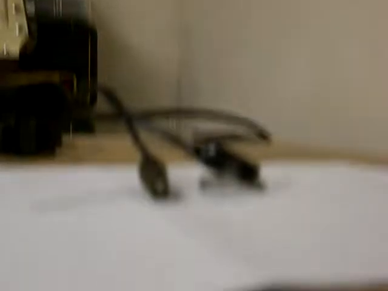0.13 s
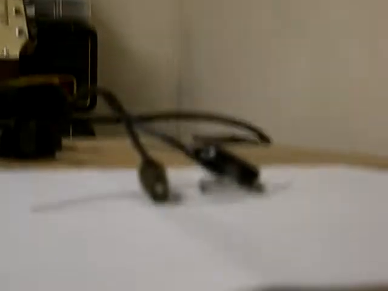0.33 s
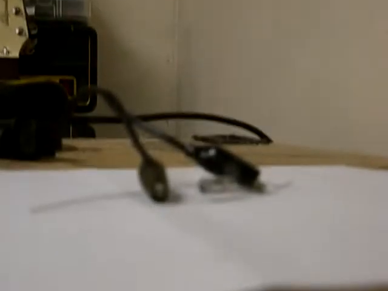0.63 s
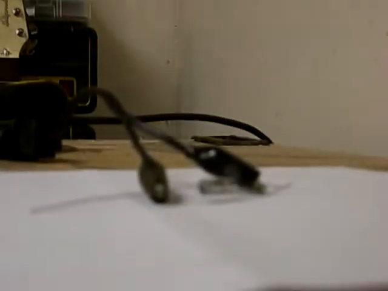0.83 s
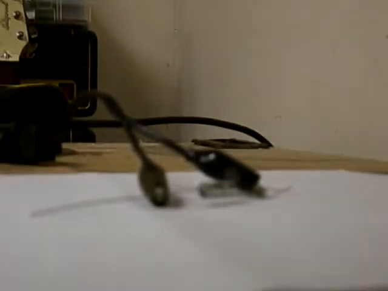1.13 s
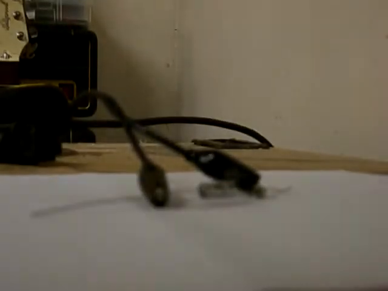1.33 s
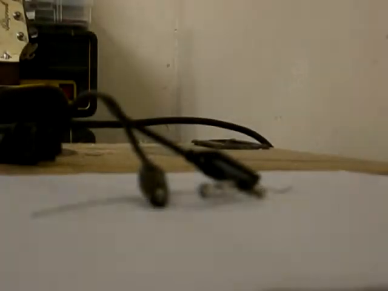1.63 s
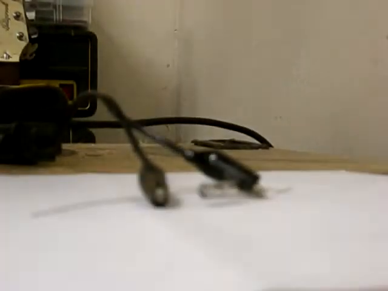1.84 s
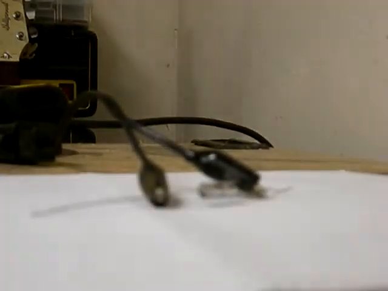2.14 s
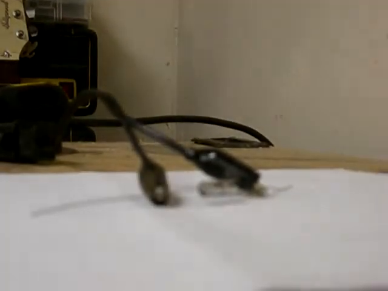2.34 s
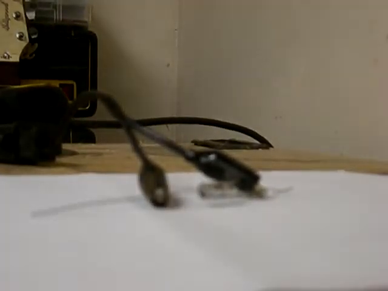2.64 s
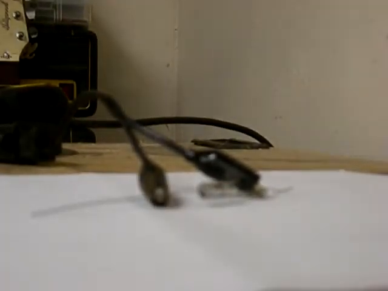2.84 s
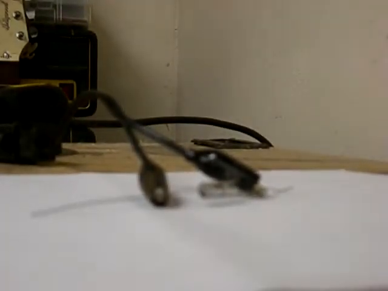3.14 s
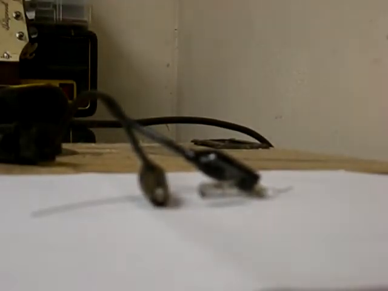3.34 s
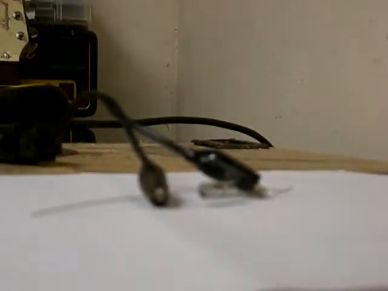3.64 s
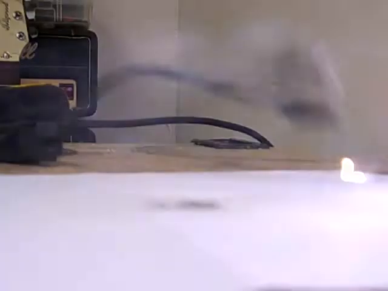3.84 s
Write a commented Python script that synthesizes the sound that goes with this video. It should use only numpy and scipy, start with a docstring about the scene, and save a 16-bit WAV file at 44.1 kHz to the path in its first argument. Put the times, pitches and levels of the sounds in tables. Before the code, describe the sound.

A small electronic part bursts with a very loud, distorted bang after faint, gathering crackles.

```python
"""Capacitor burst on a workbench

An overloaded capacitor crackles, then bursts close to a small camera. Room hiss (coloured noise) fades in
over rumble, a thin whine and bumps (decaying low sines). Soft scuffs (swelling noise bands) and
spits (noise bursts through the part's resonances) gather, and a thin wire rings. A sharp noise crack
leads the bang: arc noise, a low push, noise reverb and ringing modes. Fragments tap as the room rings
out. The bang overloads the microphone, modelled as uneven soft clipping."""
import sys
import numpy as np
from scipy import signal
from scipy.fft import rfft, irfft
from scipy.io import wavfile
from scipy.ndimage import uniform_filter1d

SR = 44100
rng = np.random.default_rng(int(sys.argv[2]) if len(sys.argv) > 2 else 0)


def pcm_store(signal):
    """Save signal as 16-bit PCM."""
    levels = np.round(np.clip(np.atleast_2d(signal), -1, 1) * 32767)
    wavfile.write(sys.argv[1], SR, levels.astype(np.int16).T)


N = 176400
T = np.arange(N) / SR  # seconds
HZ = np.fft.rfftfreq(N, 1 / SR)


def amp(db):
    """Decibels to gain."""
    return 10 ** (np.asarray(db) / 20)


def unit(x):
    """Scales to rms 1."""
    return x / np.sqrt(np.mean(x ** 2) + 1e-20)


def spectrum(points):
    """Gain at every frequency from (Hz, dB) points, joined on a log-frequency axis."""
    hz, db = np.transpose(points)
    return amp(np.interp(np.log(HZ + 1), np.log(hz + 1), db))


def level(points):
    """Gain at every moment from (seconds, dB) points."""
    return amp(np.interp(T, *np.transpose(points)))


def noise(gain):
    """Noise of rms 1 with the given colour, so only the shape of the gain matters."""
    white = rng.standard_normal(N)
    return unit(irfft(rfft(white) * gain, N))


def grain(depth_db, size=40):
    """Random flutter in strength, smoothed over size samples (about a millisecond or two)."""
    flutter = unit(uniform_filter1d(rng.standard_normal(N), size))
    return unit(amp(depth_db * flutter))


def strike(start, rise, decay):
    """Envelope with a straight rise and an exponential fall (time constant), all in seconds."""
    t = np.maximum(T - start, 0)
    fall = np.exp(-np.minimum(np.maximum(t - rise, 0) / decay, 20))
    return np.minimum(t / rise, 1) * fall


def ring(start, db, hz, t60):
    """One mode: a sine that loses 60 dB in t60 seconds."""
    t = np.maximum(T - start, 0)
    return amp(db - 60 * t / t60) * np.sin(2 * np.pi * hz * t)


def hump(hz, octaves):
    """A broad resonance: a bell on a log-frequency axis."""
    return np.exp(-.5 * (np.log2((HZ + 1) / hz) / octaves) ** 2)


# Colour of the room hiss. Each row: frequency in Hz, relative level in dB.
HISS_COLOUR = [(30, 11), (150, 13.5), (400, 7), (1000, 2.5), (2000, 0), (4500, -5), (7000, -9), (10000, -8),
               (13000, -14), (16000, -14)]
# How the hiss fades in and wavers. Each row: time in seconds, level in dB.
HISS_LEVEL = [(0, -102), (.07, -73.5), (.16, -67.5), (.37, -63), (.6, -54.5), (.9, -55), (1.35, -50),
              (1.68, -54.5), (1.95, -48.5), (2.2, -53.5), (2.6, -49), (2.87, -51), (3.1, -45),
              (3.37, -51.5), (3.55, -48), (3.75, -55)]


def room_hiss():
    """Coloured noise with a moving level."""
    return level(HISS_LEVEL) * noise(spectrum(HISS_COLOUR))


# Colour of the handling rumble. Each row: frequency in Hz, relative level in dB.
RUMBLE_COLOUR = [(3, -5.5), (10, -1.5), (20, -4.5), (40, -12), (65, -17), (110, -27), (250, -35.5),
                 (1000, -80)]
# How the rumble comes and goes. Each row: time in seconds, level in dB.
RUMBLE_LEVEL = [(0, -77), (.06, -74), (.09, -39), (.8, -41.5), (1.1, -45.5), (1.75, -43), (1.88, -38.5),
                (2.15, -45), (2.55, -32.5), (2.82, -46), (3.08, -36), (3.35, -46), (3.5, -42), (3.75, -50)]


def handling_rumble():
    """Very low noise that swells and sinks."""
    return level(RUMBLE_LEVEL) * noise(spectrum(RUMBLE_COLOUR))


# Dry ticks. Each row: start in seconds, peak level in dB.
TICKS = [(.072, -40), (.242, -34)]


def ticks(decay_s=0.00074):
    """Bare one-sided pulses that rise in two samples and die within milliseconds."""
    return sum(amp(db) * strike(start, 2 / SR, decay_s) for start, db in TICKS)


# Narrow bands of electronic hiss. Each row: centre in Hz, width in Hz, level in dB.
WHINE_BANDS = [(7830, 270, -75.5), (15750, 130, -73.5)]


def recorder_whine():
    """Steady bell-shaped noise bands, switched on at the first tick."""
    whine = 0
    for hz, width, db in WHINE_BANDS:
        whine = whine + amp(db) * noise(np.exp(-2 * ((HZ - hz) / width) ** 2))
    return whine * (T > TICKS[0][0])


# Bumps on the camera. Each row: start in seconds, level in dB, pitch in Hz.
BUMPS = [(.092, -36.5, 120), (.213, -28.5, 66), (.283, -25, 87), (.426, -30.5, 62.3), (.469, -25.5, 80),
         (2.635, -28.5, 84.7), (2.94, -30, 80), (3.098, -26, 74.4)]
# Colour of the rubbing in each bump. Each row: frequency in Hz, relative level in dB.
BUMP_RUB_COLOUR = [(60, -5), (250, 0), (500, -14), (1000, -26), (4000, -44), (16000, -48)]
BUMP_RISE_S, BUMP_DECAY_S = 0.00408, 0.017
BUMP_RUB_DB = -17  # relative to the bump level


def bumps():
    """The camera body thuds as a decaying low sine with a little rubbing noise."""
    rub = amp(BUMP_RUB_DB) * noise(spectrum(BUMP_RUB_COLOUR))
    thuds = np.zeros(N)
    for start, db, hz in BUMPS:
        thud = rub - np.sin(2 * np.pi * hz * (T - start))
        thuds += amp(db) * strike(start, BUMP_RISE_S, BUMP_DECAY_S) * thud
    return thuds


# Soft scuffs. Each row: start in seconds, length in seconds, level in dB, centre in Hz.
SCUFFS = [(0.826, 0.22, -54.5, 1290), (1.173, 0.076, -57.5, 4500), (1.327, 0.093, -55.5, 3020),
          (1.782, 0.079, -50.5, 474), (1.881, .14, -51, 606), (2.24, 0.15, -48, 540),
          (2.452, 0.051, -42, 650), (2.568, 0.045, -41.5, 516), (2.613, 0.062, -43.5, 2000),
          (2.623, 0.044, -36, 515), (2.984, 0.019, -38, 1480), (2.995, .1, -44.5, 644),
          (3.085, 0.068, -39, 530), (3.116, 0.074, -44.5, 1600), (3.177, 0.031, -37.5, 1880),
          (3.189, 0.067, -45.5, 700), (3.237, .045, -40.5, 1680), (3.458, 0.11, -51, 2200),
          (3.62, 0.084, -52, 1900)]
# Colour of the skirt around the scuff resonance, before its trim.
# Each row: frequency in Hz, relative level in dB.
SCUFF_SKIRT_COLOUR = [(60, 3), (300, 11.5), (2500, -4.5), (6000, -11), (16000, -13)]
SCUFF_OCTAVES, SCUFF_GRAIN_DB = 0.4, 3.5  # resonance spread, flutter depth
SCUFF_SKIRT_TRIM_DB = -11


def scuffs():
    """Short grainy rubs, each swelling quickly around one resonance."""
    skirt = amp(SCUFF_SKIRT_TRIM_DB) * spectrum(SCUFF_SKIRT_COLOUR)
    rubs = np.zeros(N)
    for start, length, db, hz in SCUFFS:
        progress = np.clip((T - start) / length, 0, 1)
        swell = np.sin(np.pi * progress ** 0.59)  # peaks about a third of the way in
        rubs += amp(db) * swell * noise(hump(hz, SCUFF_OCTAVES) + skirt)
    return rubs * grain(SCUFF_GRAIN_DB, size=90)


# Spits of the hot part.
# Each row: start in seconds, level in dB, decay in seconds, broadband snap in dB relative to the spit.
SPITS = [(1.465, -52.5, 0.012, 1.5), (1.504, -51.5, 0.02, -10), (1.722, -43, 0.029, -15),
         (2.034, -54, 0.014, 6.5), (2.13, -51, .018, -18), (2.288, -51, .006, 0.5), (2.343, -51, .005, -12),
         (2.393, -47, .006, -6), (2.43, -50, 0.014, -8), (2.451, -48.5, .008, -7),
         (2.463, -42.5, 0.011, 0.5), (2.572, -41.5, 0.0046, -5), (2.587, -44.5, 0.0073, -0.5),
         (2.62, -34, 0.009, -15), (2.651, -42, .011, -6), (2.719, -41.5, 0.0037, -0.5),
         (2.755, -51, .004, -14), (2.792, -36.5, 0.0043, 4.5), (2.91, -42.5, 0.013, -18),
         (2.932, -30.5, 0.01, -12), (2.951, -37.5, 0.0047, 1), (3.005, -38, .005, -4),
         (3.023, -43, .008, -7), (3.04, -46, .012, -3), (3.091, -40.5, 0.0051, -20),
         (3.135, -42.5, 0.0069, -12), (3.149, -42.5, 0.0045, -0.5), (3.29, -39, 0.0086, -12.5),
         (3.332, -54, .004, 3), (3.431, -39.5, 0.021, -9.5), (3.465, -34, 0.0064, -8.5),
         (3.481, -35, 0.02, -8.5), (3.588, -39, 0.0044, -6), (3.654, -37.5, 0.0036, 6),
         (3.668, -51, 0.006, -4), (3.729, -49, .004, -17)]
# The part's resonances. Each row: centre in Hz, width in Hz, relative level in dB before a treble tilt.
CASE_MODES = [(6280, 200, -16), (7070, 300, -8), (8330, 220, -6), (10220, 170, 6.5), (11500, 370, -1.5),
              (12800, 230, -1.5), (13500, 250, -4), (15400, 580, -6.5)]
# Colour of the broadband snap. Each row: frequency in Hz, relative level in dB.
SNAP_COLOUR = [(200, -14), (1000, -4), (2200, -2), (3800, 0.5), (7000, -2), (11000, -6), (16000, -21)]
SPIT_RISE_S, SPIT_GRAIN_DB = 0.00066, 3


def crackle(echo_db=-17, echo_s=0.021):
    """Grainy spits ring the case; the sharper ones snap across the whole band."""
    power = sum(amp(db) ** 2 / (1 + (2 * (HZ - hz) / width) ** 2) for hz, width, db in CASE_MODES)
    treble_tilt = HZ / (HZ + 4000)
    case = noise(np.sqrt(power) * treble_tilt)
    snap = noise(spectrum(SNAP_COLOUR))
    spits = np.zeros(N)
    for start, db, decay, snap_db in SPITS:
        direct = strike(start, SPIT_RISE_S, decay)
        echo = amp(echo_db) * strike(start, 0.0035, echo_s)  # a softer, slower tail
        spits += amp(db) * (direct + echo) * (case + amp(snap_db) * snap)
    return spits * grain(SPIT_GRAIN_DB)


# The thin wire. Its one row: start in seconds, level in dB, pitch in Hz, 60 dB decay in seconds.
WIRE_PING = (3.486, -35, 8385, 0.3)


def wire_ping():
    """A thin wire rings as one high decaying sine."""
    return ring(*WIRE_PING)


# Colour of the leading crack. Each row: frequency in Hz, relative level in dB.
CRACK_COLOUR = [(200, -20), (1200, -10), (3000, -9), (9000, 3), (16000, -2)]
CRACK_S, CRACK_DB, CRACK_DECAY_S = 3.7735, -5.5, 0.0015


def case_crack():
    """The case cracks: a very short, bright noise burst."""
    return amp(CRACK_DB) * strike(CRACK_S, .0002, CRACK_DECAY_S) * noise(spectrum(CRACK_COLOUR))


BANG_S = 3.780  # start of the arc, push, room sound and bench rings
# Colour of the arc. Each row: frequency in Hz, relative level in dB.
ARC_COLOUR = [(40, 3), (200, 3.5), (1000, 1.5), (3500, 0.5), (7000, -2.5), (10000, 2), (16000, -9.5)]
ARC_LENGTH_S, ARC_DB = .03, -4


def arc():
    """An arc flares briefly: a hard-gated slab of grainy noise."""
    gate = (T > BANG_S) & (T < BANG_S + ARC_LENGTH_S)
    return amp(ARC_DB) * gate * noise(spectrum(ARC_COLOUR)) * grain(4, size=80)


PUSH_HZ, PUSH_DB, PUSH_DECAY_S = 65.4, -8, 0.023


def pressure_push():
    """The pressure wave shakes the camera: a decaying low cosine that starts downward."""
    wave = -np.cos(2 * np.pi * PUSH_HZ * (T - BANG_S))
    return amp(PUSH_DB) * strike(BANG_S, 0.0011, PUSH_DECAY_S) * wave


# Colour of the early room sound. Each row: frequency in Hz, relative level in dB.
EARLY_COLOUR = [(40, -14), (150, 2), (350, 2), (700, -2), (1300, -1.5), (2200, 0.5), (3700, 1.5),
                (5500, -7.5), (7500, -11), (10300, -10.5), (13000, -18), (16000, -27)]
# Colour of the late room sound. Each row: frequency in Hz, relative level in dB.
LATE_COLOUR = [(40, -12), (115, 1), (190, -3), (270, 2.5), (390, 2), (550, -6), (900, -13), (1400, -7.5),
               (2200, 0), (4000, 1.5), (5500, -2.5), (7500, -11), (10300, -7.5), (13000, -23), (16000, -29)]
EARLY_DB, EARLY_T60_S = 0, 0.21
LATE_DB, LATE_T60_S = -23, 0.99


def room_reverb():
    """The small room answers with a loud short noise tail and a faint long one."""
    to_decay = 1 / np.log(1000)  # 60 dB time to time constant
    early = amp(EARLY_DB) * strike(BANG_S, 0.0044, EARLY_T60_S * to_decay) * noise(spectrum(EARLY_COLOUR))
    late = amp(LATE_DB) * strike(BANG_S, 0.013, LATE_T60_S * to_decay) * noise(spectrum(LATE_COLOUR))
    return early + late


# Things ringing on the bench. Each row: pitch in Hz, level in dB, 60 dB decay in seconds.
BENCH_RINGS = [(112.3, -36.5, 1.3), (190, -35, 0.86), (264, -33, 0.66), (377, -35.5, 1.9), (1916, -39, 1.1),
               (2200, -34, 1), (2360, -40, 0.97)]


def bench_rings():
    """Things on the bench ring on as decaying sines."""
    return sum(ring(BANG_S, db, hz, t60) for hz, db, t60 in BENCH_RINGS)


# Fragments landing. Each row: start in seconds, level in dB, centre in Hz.
FRAGMENTS = [(3.886, -25, 5000), (3.949, -34, 6000), (3.993, -32, 950)]
FRAGMENT_DECAY_S = .005


def fragments():
    """Bits of the case tap the bench and wall: short bursts of broad-band noise."""
    taps = np.zeros(N)
    for start, db, hz in FRAGMENTS:
        taps += amp(db) * strike(start, .001, FRAGMENT_DECAY_S) * noise(hump(hz, .6))
    return taps


def scene():
    """Everything that reaches the microphone, as one channel."""
    background = room_hiss() + handling_rumble() + recorder_whine()
    build_up = ticks() + bumps() + scuffs() + crackle() + wire_ping()
    bang = case_crack() + arc() + pressure_push() + room_reverb() + bench_rings()
    return (background + build_up + bang + fragments())[None]


# Microphone colour, with a narrow treble dip. Each row: frequency in Hz, gain in dB.
MIC_COLOUR = [(20, 0.5), (7300, -1), (7850, -5), (8300, 0), (16000, -3)]
CLIP_TOP, CLIP_BOTTOM = 0.61, 0.46  # limits of the two half-waves before the filters
EDGE_HZ = 16000  # upper band limit


def record(dry):
    """The microphone overloads unevenly, then its colour and the band limit filter the result."""
    rail = np.where(dry > 0, CLIP_TOP, CLIP_BOTTOM)
    clipped = rail * np.tanh(dry / rail)
    colour = signal.firwin2(513, np.linspace(0, 1, len(HZ)), spectrum(MIC_COLOUR))
    edge = signal.firwin(511, EDGE_HZ, window=("kaiser", 9), fs=SR)
    return signal.oaconvolve(clipped, np.convolve(colour, edge)[None], "same")


dry = scene()
out = record(dry)
pcm_store(out)
```